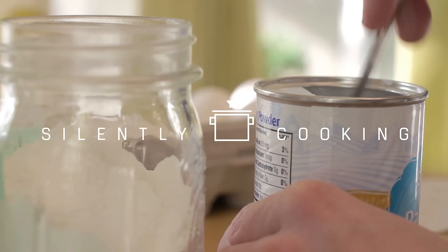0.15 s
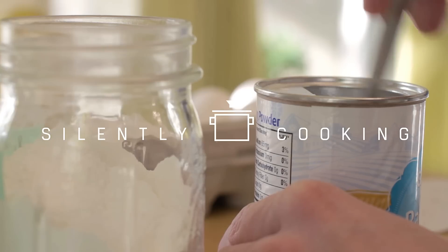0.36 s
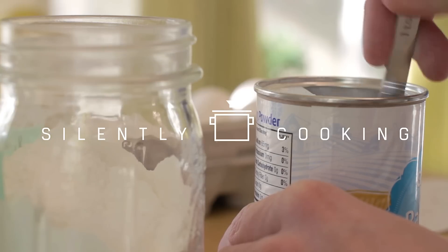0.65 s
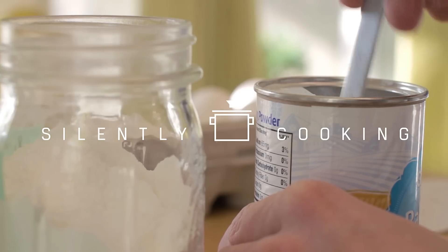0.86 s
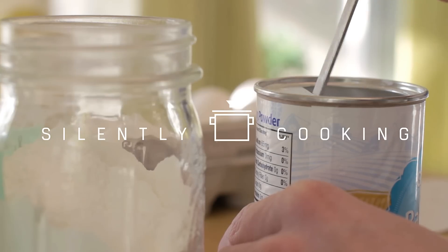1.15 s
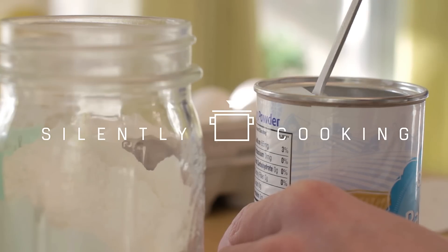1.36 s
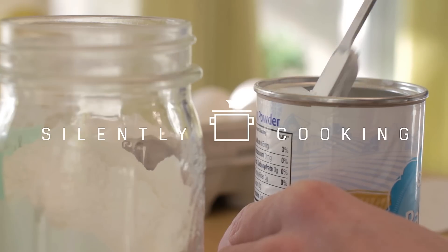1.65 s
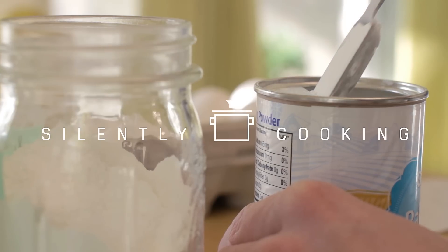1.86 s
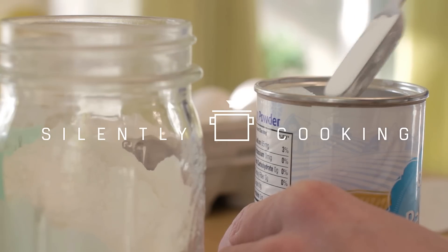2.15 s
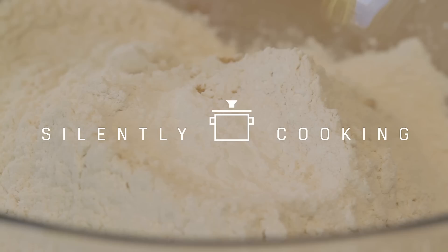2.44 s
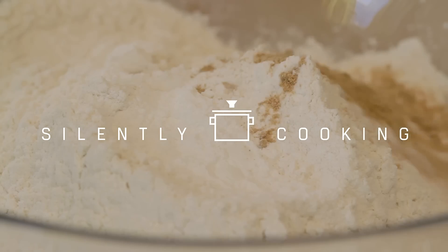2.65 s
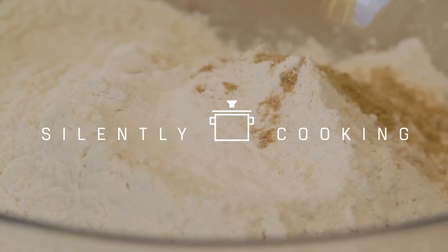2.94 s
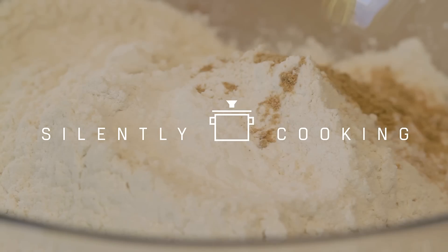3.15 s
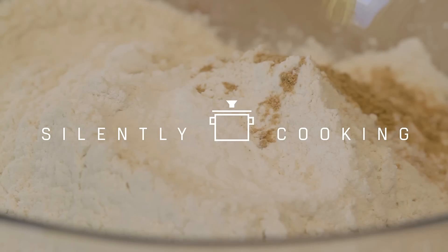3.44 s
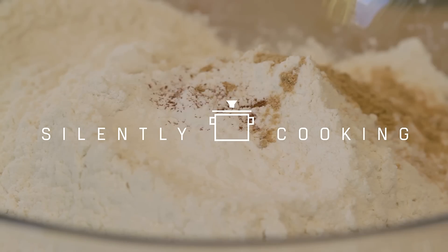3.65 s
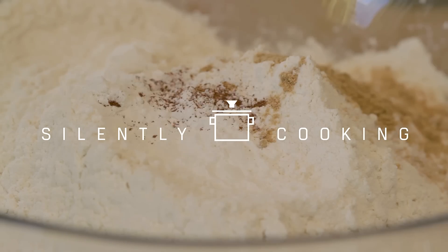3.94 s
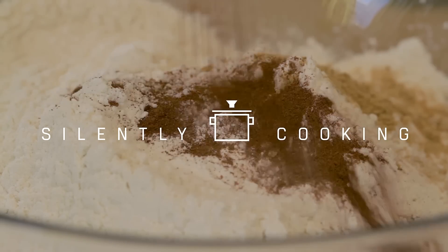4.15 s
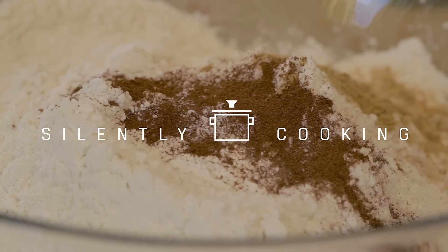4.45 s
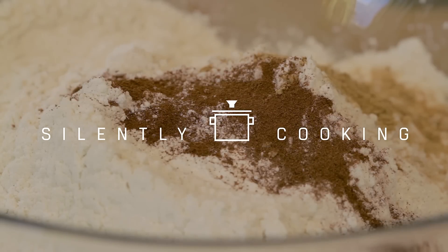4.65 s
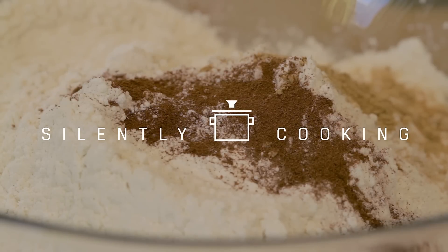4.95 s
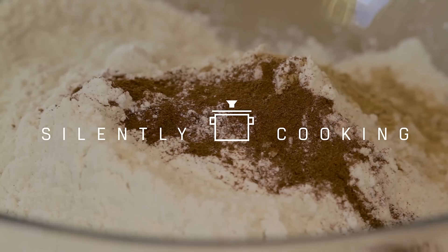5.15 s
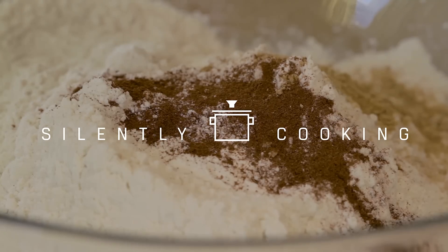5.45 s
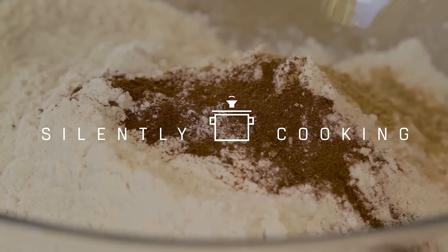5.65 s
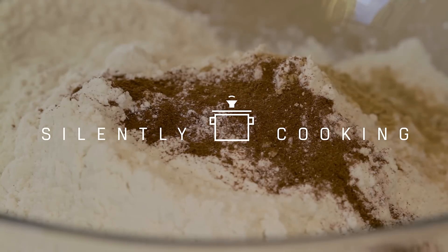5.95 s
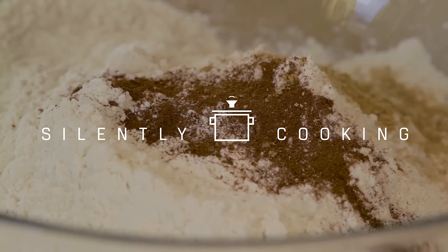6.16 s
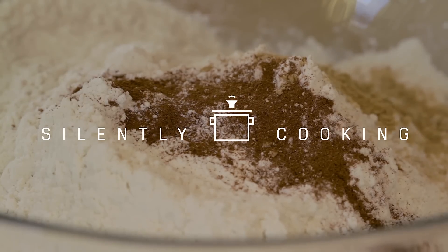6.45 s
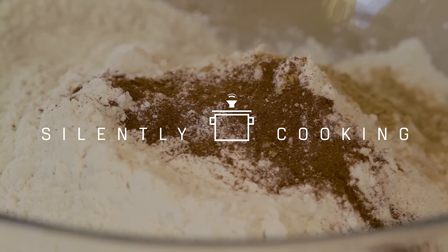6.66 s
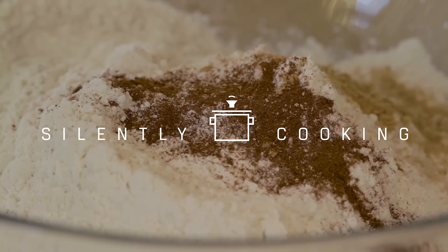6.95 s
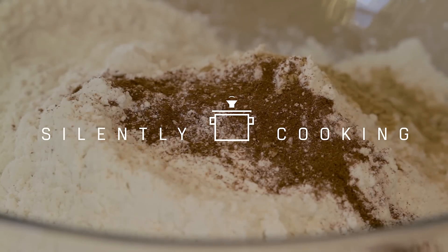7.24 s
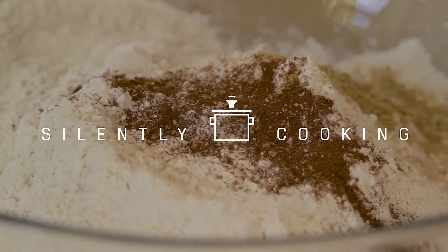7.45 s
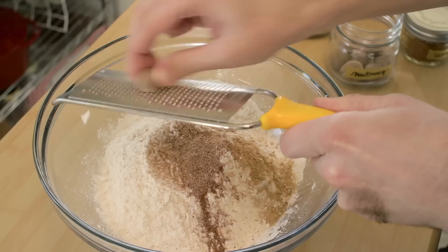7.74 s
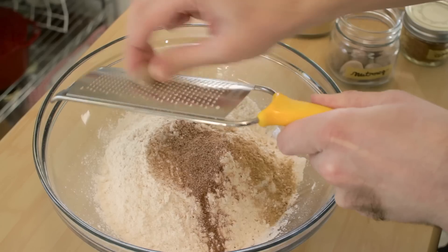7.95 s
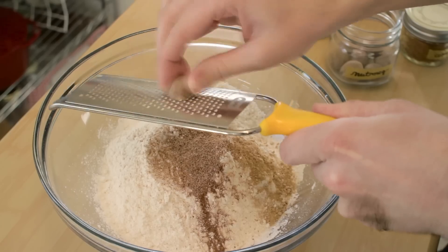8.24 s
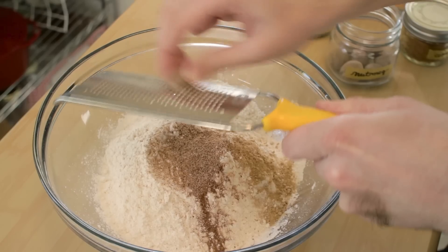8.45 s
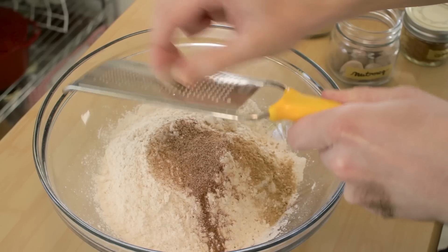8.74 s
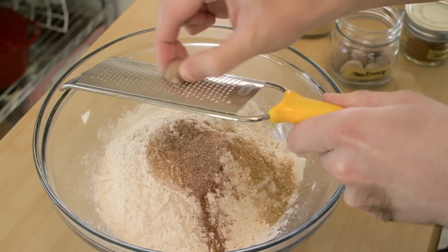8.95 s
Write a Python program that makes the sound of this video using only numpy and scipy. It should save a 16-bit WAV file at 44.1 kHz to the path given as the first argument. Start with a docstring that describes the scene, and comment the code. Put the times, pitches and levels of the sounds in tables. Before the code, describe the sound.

In a quiet kitchen, a spoon digs, clanks and drags along a tin's lip; after a near-silent pause, brisk back-and-forth metal grating runs to the end.

```python
"""A kitchen counter, close to a stereo microphone, over low room tone and hiss. A steel measuring spoon digs
in a tin of powder, knocks on it and is dragged along its lip: random fractures and struck modes coloured by
the tin. Shakes of spice sift down softly, then one light clink. A nutmeg is rubbed to and fro over a fine
steel rasp, about eleven strokes a second: bursts of crumbs shake a resonant blade. A second passage of
grating is closer and drier. Each source and its room echoes are heard almost wholly in the centre."""
import sys
import numpy as np
from scipy import signal
from scipy.fft import rfft, irfft
from scipy.io import wavfile
from scipy.ndimage import uniform_filter1d, map_coordinates

SR = 44100
rng = np.random.default_rng(int(sys.argv[2]) if len(sys.argv) > 2 else 0)


def generate_wav(sig):
    """Save sig (samples, or channels by samples) to the path in sys.argv[1] as 16-bit PCM at SR."""
    pcm = np.round(np.clip(np.atleast_2d(sig).T, -1, 1) * 32767).astype(np.int16)
    wavfile.write(sys.argv[1], SR, pcm)


N = 401751
TIME = np.arange(N) / SR
HZ = np.fft.rfftfreq(4096, 1 / SR)
SECOND_PASSAGE_S = 7.754  # strokes centred after this are in the closer, drier passage of grating


def amp(db):
    """Amplitude of a level in dB."""
    return 10 ** (np.asarray(db) / 20)


def evened(x):
    """The signal brought to an RMS of 1."""
    return x / np.sqrt(np.mean(x ** 2) + 1e-20)


def read(points, hz):
    """A spectrum joined by straight lines on a log-frequency axis."""
    f, value = np.transpose(points)
    return np.interp(np.log(hz + 1), np.log(f + 1), value)


def level(curve, fade_db_per_s=250):
    """Gain over time from (time [s], level [dB]) rows; silent before them, fading after them."""
    s, db = np.transpose(curve)
    fade_db = fade_db_per_s * np.maximum(TIME - s[-1], 0)
    return (TIME >= s[0]) * amp(np.interp(TIME, s, db) - fade_db)


def gestures(rows, attack_s, release_db_per_s):
    """Gain over time of short moves of the hand: each swells, holds for its length and dies away."""
    gain = np.zeros(N)
    for start, length, db, *_ in rows:
        t = np.arange(0, length + 1, 1 / SR)
        release_db = release_db_per_s * np.maximum(t - length, 0)
        add(gain, start, np.minimum(t / attack_s, 1) * amp(db - release_db))
    return gain


def add(mix, s, sound):
    """Lay a sound into the mix at a time in seconds."""
    part = mix[round(s * SR):][:len(sound)]
    part += sound[:len(part)]


def ringing(t, hz, t60):
    """One damped resonance, 60 dB down after t60 seconds."""
    return np.exp(-np.log(1000) * t / t60) * np.sin(2 * np.pi * hz * t)


def humps(modes):
    """The dB that resonances (frequency [Hz], width [Hz], height [dB]) add to a spectrum."""
    return sum(db / (1 + (2 * (HZ - hz) / width) ** 2) for hz, width, db in modes)


def response(db, low_cut_hz=105):
    """Causal impulse response of energy 1 with the given spectrum; small objects radiate little bass."""
    db = db - 10 * np.log10(1 + (low_cut_hz / (HZ + 1)) ** 4)
    log_gain = np.log(amp(np.maximum(db, db.max() - 90)))
    mirrored = np.r_[log_gain, log_gain[-2:0:-1]]
    minimum_phase = np.exp(np.conj(signal.hilbert(mirrored)))
    h = np.fft.ifft(minimum_phase).real
    return h / np.linalg.norm(h)


def through(x, db):
    """The signal coloured by a spectrum in dB."""
    return signal.oaconvolve(x, response(db))[:N]


def crackle(count, per_s, spread_db):
    """Tiny fractures at random moments, of varying size."""
    size = amp(spread_db * np.minimum(rng.exponential(1, count), 4))
    happens = rng.random(count) < per_s / SR
    return evened(size * rng.standard_normal(count) * happens)


# how long the kitchen's echoes last: (frequency [Hz], t60 [s])
ECHO_DECAY = [(150, 0.52), (1000, 0.29), (3000, 0.28), (7000, 0.2), (15000, 0.13)]


def reflections():
    """Dense wall echoes after a short gap, each band dying at its own speed."""
    count = SR // 2
    echoes = rng.choice([-1., 1.], count) * (rng.random(count) < .15)
    hz, t, z = signal.stft(echoes, SR, nperseg=256)
    decay = amp(-60 * t / read(ECHO_DECAY, hz)[:, None])
    tail = signal.istft(z * decay, SR, nperseg=256)[1]
    tail *= np.clip(np.arange(len(tail)) / SR / 0.0036 - 1, 0, 1)  # silent for 3.6 ms, then rising
    return tail / np.linalg.norm(tail)


# gain of the faint left-minus-right remainder: (frequency [Hz], level [dB])
SIDE_REMAINDER = [(100, -3), (300, -18), (700, -25), (1400, -81), (2800, -63), (5500, -65), (12000, -70)]


def kitchen(x, wet_db):
    """Direct sound and its room echoes almost wholly in the centre, with a faint left-right remainder."""
    mid, side = (amp(wet_db) * signal.oaconvolve(x, reflections())[:N] for _ in range(2))
    padded = 2 ** 19
    side_gain = amp(read(SIDE_REMAINDER, np.fft.rfftfreq(padded, 1 / SR)))
    side = irfft(rfft(side, padded) * side_gain)[:N]
    return x + mid + np.array([side, -side])


# room tone and hiss: (frequency [Hz], early level [dB], settled level [dB],
# level of the part that differs between the ears [dB])
ROOM_TONE = [(25, -32, -37, -26), (50, -24, -19, -27), (71.54, -15.5, -11, -26), (111, -9, -13, -16.5),
             (146, -9, -1.5, -12), (197, 3, -2.5, -5), (260.6, 0.5, -3.5, -4.5), (500, -2, -9, -4),
             (800, -5, -9, -4.5), (1493, -8, -11, -11), (5890, -11, -12.5, -10), (10100, -12, -16, -12),
             (15800, -19.5, -23, -21)]
SETTLING_S = (6.06, 6.8)  # the tone passes from its early to its settled colour between these times


def hush(gain_db=-49.5, second_side_db=-3):
    """Steady noise as room tone and hiss; it changes colour during the grating, then narrows."""
    hz, *columns = np.transpose(ROOM_TONE)
    f = np.fft.rfftfreq(N, 1 / SR)
    early, late, side = (irfft(rfft(rng.standard_normal(N)) * amp(read(np.c_[hz, db], f)), N)
                         for db in columns)
    settled = np.interp(TIME, SETTLING_S, [0, 1])
    centre = np.sqrt(1 - settled) * early + np.sqrt(settled) * late
    side = side * amp(second_side_db * (TIME >= SECOND_PASSAGE_S))
    return amp(gain_db) * (centre + np.array([side, -side]))


# pushes of the spoon through the powder: (start [s], length [s], level [dB])
DIG_MOVES = [(0, 0.0076, -48.5), (.928, 0.16, -51.5), (1.152, .022, -54.5)]
# colour of the crunching powder: (frequency [Hz], level [dB])
POWDER_COLOUR = [(88, -42), (150, -5), (314, 0), (381, -2), (471, 1.5), (948, -4), (1060, -3), (1240, -2.5),
                 (2230, -12), (3410, -5), (5330, -14), (6860, -12.5), (11100, -21), (12500, -18),
                 (15500, -32)]
# spoon dragged over the tin's lip: (time [s], level [dB])
LIP_LEVEL = [(1.33, -56), (1.37, -53), (1.388, -34.5), (1.518, -44), (1.536, -38.5), (1.634, -45.5),
             (1.65, -38), (1.686, -52), (1.95, -47.5)]
# it tips onto the sharp edge and is pulled off: (time [s], level [dB])
EDGE_LEVEL = [(1.68, -54.5), (1.85, -58), (1.952, -49), (1.98, -37.5), (2.005, -41.5), (2.014, -31),
              (2.052, -36.5), (2.06, -63)]
# broad colour of the flat lip, then of the sharp edge: (frequency [Hz], level [dB])
LIP_COLOUR = [(100, -19), (200, -10.5), (280, -0.5), (750, 4), (1300, -2), (1700, -7.5), (3600, -6.5),
              (6000, -13.5), (9000, -27), (16000, -38)]
EDGE_COLOUR = [(100, -24), (300, -10.5), (800, -3), (1900, -4.5), (3600, -7.5), (5500, -12), (7500, -16),
               (9000, -28), (12000, -28), (16000, -37)]
# resonances of the tin with the spoon against it:
# (frequency [Hz], width [Hz], height on the lip [dB], height on the edge [dB])
TIN_MODES = [(305, 94, 7, -5), (1247, 180, 12, 7), (1894, 86, -5.5, 9), (2550, 200, 8, 9.5),
             (3650, 280, 4, 7), (4090, 180, 10.5, 4), (5900, 260, -5, 5), (6950, 300, 9, 3),
             (7820, 440, 10, 10), (9100, 220, 5, 10), (10200, 260, 9, 13), (13600, 700, 9, 15)]
STIR_END_S, STIR_DB = 1.36, -64  # it stirs lightly between the digs, until it is lifted
JUDDER_DB, JUDDER_S = 2.5, .014  # depth and pace of its sticking and slipping on the lip


def spoon_drag(powder_coupling=0.22, lip_gain_db=-0.5):
    """Steel sticks and slips on the tin's lip, brighter on its edge; powder crunches under the bowl."""
    hz, width, lip_db, edge_db = np.transpose(TIN_MODES)
    on_lip, on_edge = humps(zip(hz, width, lip_db)), humps(zip(hz, width, edge_db))
    judder = np.interp(TIME / JUDDER_S, np.arange(SR), rng.standard_normal(SR))
    sliding = level(LIP_LEVEL, fade_db_per_s=128) * amp(lip_gain_db + JUDDER_DB * judder)
    lip_force = sliding * crackle(N, per_s=2500, spread_db=0)
    lip = through(lip_force, read(LIP_COLOUR, HZ) + on_lip)
    edge_force = level(EDGE_LEVEL) * crackle(N, per_s=2700, spread_db=0)
    edge = through(edge_force, read(EDGE_COLOUR, HZ) + on_edge)
    digs = gestures(DIG_MOVES, attack_s=0.0042, release_db_per_s=162)
    digging = np.hypot(digs, amp(STIR_DB) * (TIME < STIR_END_S))
    powder_force = digging * crackle(N, per_s=6000, spread_db=3.0)
    # buried in powder, the spoon wakes the tin only weakly
    powder = through(powder_force, read(POWDER_COLOUR, HZ) + powder_coupling * on_lip)
    return lip + edge + powder


# the spoon chatters on the tin's wall: (time [s], mean pitch [Hz], level [dB])
WALL_CHATTER = [(0, 443, -59), (.022, 442, -53.5), (.052, 431, -48), (.08, 430, -58), (.11, 433, -60),
                (.15, 427, -74)]


def chatter(waver=0.083, flutter=0.52):
    """A short uneven groan of the spoon rubbing the tin's wall: a tone of wandering pitch and level."""
    s, hz, db = np.transpose(WALL_CHATTER)
    drift, swell = (evened(uniform_filter1d(rng.standard_normal(N), 300)) for _ in range(2))
    turns = np.cumsum(np.interp(TIME, s, hz) * (1 + waver * drift)) / SR
    return np.sqrt(2) * level(np.c_[s, db]) * (1 + flutter * swell) * np.sin(2 * np.pi * turns)


# dull bumps of the utensils: (time [s], level [dB], frequency [Hz], t60 [s])
UTENSIL_BUMPS = [(0.241, -45, 323, .06), (.285, -42, 142, 0.093), (0.285, -30.5, 286, 0.051),
                 (0.501, -33, 330, 0.035), (.501, -43.5, 610, 0.027), (.501, -44, 1190, 0.027),
                 (.579, -46.5, 357, 0.11), (1.156, -42.5, 326, 0.066), (1.357, -32, 284, 0.038),
                 (1.573, -34, 326, 0.1), (1.592, -31, 340, 0.09), (2.05, -15, 1237, 0.022),
                 (4.067, -47, 211, 0.061)]


def bumps(rise_cycles=1.13):
    """Soft contacts, each swelling over a cycle or so and waking one quickly damped resonance."""
    out, t = np.zeros(N), np.arange(SR // 4) / SR
    for s, db, hz, t60 in UTENSIL_BUMPS:
        swell = 1 - np.exp(-(hz * t / rise_cycles) ** 2)
        add(out, s, amp(db) * swell * ringing(t, hz, t60))
    return out


# the spoon's knocks, bounces and ticks: (time [s], strength [dB], tilt [dB per octave])
SPOON_KNOCKS = [(0.284, 7.5, 1.5), (0.285, 3, 4.5), (.2862, -10, -2), (0.2882, -15, -9), (0.2944, -3, -6),
                (0.3246, -7, 0), (.968, -22.5, 14), (1.05, -31, 12), (1.0648, -24, 14), (1.08, -23, 1),
                (1.1669, -29, 4), (1.637, -21, 4), (2.051, -13, 4)]
# colour of the crack of a knock: (frequency [Hz], level [dB])
KNOCK_COLOUR = [(100, -37), (300, -8.5), (550, -7), (850, 9), (1400, 5.5), (2100, -9), (2600, 1),
                (3700, 5.5), (4500, -7.5), (5200, -4.5), (6300, -7), (7100, -23), (7900, -14.5),
                (10800, -24), (15500, -42)]
# what a knock rings with: (frequency [Hz], level [dB], t60 [s])
KNOCK_RING = [(697, -19, 0.16), (795, 6, 0.076), (1000, 15, 0.079), (1130, -0.5, .12), (1420, 7, 0.15),
              (1810, 5, 0.13), (2620, -17.5, 0.17), (2662, -9, .13), (3170, -6, .1), (3535, -12, 0.078),
              (3662, -16, 0.082), (3900, -21, .14), (4000, -3, .11), (5160, -17, .12), (5130, -11.5, .09),
              (5400, -15, .12), (5630, -18.5, 0.13), (6100, -16.5, .11), (7900, -21.5, 0.091),
              (8120, -9, .13)]


def knocks(ring_db=-51, smear=0.5, clatter_db=-7, clatter_t60=0.055):
    """Hard contacts on sheet metal: a smeared crack, a clatter of dense modes, and clear ones ringing on."""
    cracks, ring, t = np.zeros(N), np.zeros(N), np.arange(SR // 3) / SR
    for s, db, tilt_db in SPOON_KNOCKS:
        tilt = tilt_db * np.log2(HZ / 3000 + 0.19)
        add(cracks, s, amp(db) * response(read(KNOCK_COLOUR, HZ) + tilt))
        for k, (hz, mode_db, t60) in enumerate(KNOCK_RING):
            gain = (-1) ** k * amp(db + ring_db + mode_db + tilt_db * np.log2(hz / 3000))
            add(ring, s, gain * ringing(t, hz, t60))
    for _ in range(8):  # bending waves: the treble arrives first
        cracks = signal.lfilter([-smear, 1], [1, -smear], cracks)
    dense = rng.standard_normal(len(t)) * np.exp(-np.log(1000) * t / clatter_t60)
    clatter = signal.oaconvolve(cracks, dense / np.linalg.norm(dense))[:N]
    return cracks + ring + amp(clatter_db) * clatter


# thin squeals of the sliding spoon: (start [s], length [s], level [dB], pitch [Hz])
SPOON_SQUEALS = [(1.389, .03, -46, 7040), (1.545, 0.069, -59, 7120), (1.832, .08, -58, 6990),
                 (1.958, .035, -54, 7250)]


def squeal(width_hz=380):
    """Friction keeps one high mode of the spoon ringing; it drifts with the point of contact."""
    start, length, _, hz = np.transpose(SPOON_SQUEALS)
    r = np.exp(-np.pi * width_hz / SR)
    noise = rng.standard_normal(N) + 1j * rng.standard_normal(N)
    ring = signal.lfilter([1], [1, -2 * r, r * r], noise)
    turns = np.cumsum(np.interp(TIME, start + length / 2, hz)) / SR
    tone = evened((ring * np.exp(2j * np.pi * turns)).real)  # the narrow noise moved up to the pitch
    return gestures(SPOON_SQUEALS, attack_s=.02, release_db_per_s=300) * tone


# shakes of spice sift softly into the bowl: (start [s], length [s], level [dB])
SPICE_SHAKES = [(3.24, 0.23, -66), (3.53, .27, -70), (4.04, 0.066, -65.5), (4.25, .04, -67),
                (4.38, .04, -73)]
# colour of the falling spice: (frequency [Hz], level [dB])
SPICE_COLOUR = [(80, -16), (200, 4), (500, -1.5), (1400, -5), (3000, -11), (7000, -21), (15000, -35)]


def sifting():
    """Fine powder landing on flour: many tiny impacts, dull in colour."""
    flow = gestures(SPICE_SHAKES, attack_s=0.03, release_db_per_s=122.5)
    return through(flow * crackle(N, per_s=3700, spread_db=2.0), read(SPICE_COLOUR, HZ))


# a light clink across the counter: (time [s], strength [dB])
CLINK_CONTACTS = [(4.7168, -22.5), (4.752, -35)]
# its colour: (frequency [Hz], level [dB])
CLINK_COLOUR = [(300, -25), (700, -16), (1100, -1), (1500, -8), (1900, -16), (2300, -9), (2700, -11.5),
                (3300, -17), (3700, -5), (4200, -18), (5000, -14), (7000, -23), (12000, -36)]


def clinks(fade_s=0.013):
    """Something small is set down: a brief rattle of contacts."""
    force, t = np.zeros(N), np.arange(SR // 10) / SR
    for s, db in CLINK_CONTACTS:
        rattle = crackle(len(t), per_s=5500, spread_db=2.5) * np.exp(-t / fade_s)
        add(force, s, amp(db) * rattle / np.linalg.norm(rattle))
    return through(force, read(CLINK_COLOUR, HZ))


CATCH_S, SKATE_DB = .018, -4  # the nut skates this long, this much quieter, until the teeth catch
CHIP_DB, CHIP_S = 3, 0.0019  # mean surge and half-length of the one larger chip that a stroke breaks off


def hold_of_teeth(t):
    """Slack until the teeth catch, then a short surge where a chip breaks off."""
    chip_at, chip_size = rng.uniform(0.212, .8) * t[-1], 2 * rng.random()
    surge_db = CHIP_DB * chip_size * np.exp(-((t - chip_at) / CHIP_S) ** 2)
    return amp(SKATE_DB * (t < CATCH_S) + surge_db)


def blade_echo(force, speed, near_s=0.000522, travel_s=0.000882, strength=0.32):
    """Waves return from the blade's end; their delay slides as the nut travels, so the colour sweeps."""
    place = np.cumsum(speed) / speed.sum()
    nearest_s = near_s * (1 + 2 * rng.random())
    slide_s = travel_s * rng.uniform(0.33, 1)
    lag = nearest_s + slide_s * (place if rng.random() < .5 else 1 - place)
    returned = map_coordinates(force, [np.arange(len(force)) - lag * SR], order=3)
    return (force + strength * returned) / np.hypot(1, strength)


# a push cuts brightly, the way back rubs duller: (frequency [Hz], pushed [dB], drawn back [dB])
BITE_COLOUR = [(450, 0, 0.5), (1190, -4.5, 2), (2800, -2, .5), (7500, -0.5, -2), (13000, 2, -2)]
# level of the grating's low end: (time [s], level [dB])
LOW_END_LEVEL = [(5.1, 10), (5.8, 11.5), (6.05, 4), (6.5, 7), (6.75, 0.5), (7.25, -0.5), (7.5, 0),
                 (7.78, 2.5), (7.93, 11), (8.13, 2.5), (8.43, 11.5), (8.7, -2), (8.97, 2.5)]
LOW_END_HZ = (700, 1240)  # how far up it reaches in the first and the second passage
FASTEST_SHARE = .455  # how far into a stroke the nut moves fastest
SPEED_POWER = 1.305  # the force grows as this power of speed


def stroke(row, passage, teeth_hz=420, jitter=.3, snag=0.3, patchy_db=2.5):
    """The nut speeds up and slows; each row of teeth it meets tears off a burst of crumbs."""
    start, length, db, bite = row
    t = np.arange(0, length, 1 / SR)
    speed = np.abs(np.sin(np.interp(t / length, [0, FASTEST_SHARE, 1], [0, np.pi / 2, np.pi])))
    wander = evened(uniform_filter1d(rng.standard_normal(SR // 4), 200))[:len(t)]
    # rows of teeth passed so far; teeth_hz is their mean rate at full speed
    teeth = np.cumsum(teeth_hz * speed * (1 + jitter * wander)) / SR + rng.random()
    cutting = evened(1 - snag + 2 * snag * np.exp(-(teeth % 1) / 0.38))
    crumbs = crackle(SR // 4, per_s=22000, spread_db=0.5)[:len(t)]
    force = blade_echo(speed ** SPEED_POWER * cutting * crumbs, speed)
    hz = np.fft.rfftfreq(len(t), 1 / SR)
    pushing = (1 + bite) / 2
    colour = read([(f, drawn + (pushed - drawn) * pushing) for f, pushed, drawn in BITE_COLOUR], hz)
    low_db = np.interp(start + length / 2, *np.transpose(LOW_END_LEVEL))
    low_end = low_db / (1 + (hz / LOW_END_HZ[passage]) ** 4)
    # each pass takes another path over the blade and favours other modes
    path = np.interp(hz, np.linspace(0, SR / 2, 160), rng.standard_normal(size=160))
    coloured = irfft(rfft(force) * amp(colour + low_end + patchy_db * path), len(t))
    return amp(db) * hold_of_teeth(t) * coloured


# the nut goes to and fro:
# (start [s], length [s], level [dB], bite [about 1 pushed on the teeth, about -1 drawn back])
NUT_STROKES = [(5.108, 0.16, -41, -0.14), (5.286, 0.13, -44.5, -0.56), (5.383, 0.095, -33, 0.86),
               (5.503, 0.11, -35.5, -1.2), (5.593, 0.101, -33, 1), (5.69, 0.1, -32.5, -1.8),
               (5.785, 0.082, -30, 0.4), (5.871, 0.091, -27.5, -1.6), (5.966, 0.081, -28, -0.13),
               (6.047, 0.098, -33, -1.2), (6.141, 0.098, -27.5, 0.95), (6.233, 0.081, -30.4, -1.4),
               (6.319, 0.095, -28.5, 0.38), (6.411, 0.093, -28.5, -1), (6.5, 0.099, -26, 1),
               (6.612, 0.061, -28, -1.3), (6.682, 0.095, -27.5, 0.74), (6.768, 0.1, -31.5, -1.2),
               (6.855, 0.093, -25.5, 0.72), (6.957, 0.08, -26, -0.68), (7.046, 0.09, -26, 1),
               (7.141, 0.083, -25.5, -1.2), (7.223, 0.094, -26, 1), (7.328, 0.065, -27.5, 0.29),
               (7.404, 0.09, -26.5, 1), (7.467, 0.11, -27, -0.18), (7.561, 0.1, -28.5, 0.52),
               (7.646, 0.097, -25.5, 1), (7.745, 0.11, -31.5, -1), (7.856, 0.11, -26, 1),
               (7.971, 0.078, -26.5, -0.51), (8.064, 0.093, -23, 0.64), (8.165, 0.11, -28, -0.88),
               (8.274, 0.08, -21.5, 0.94), (8.354, 0.091, -25.5, -0.64), (8.447, 0.093, -25.5, 1),
               (8.543, 0.096, -26.5, -1.3), (8.631, 0.1, -25.5, -0.014), (8.733, 0.1, -31, -1.1),
               (8.823, 0.1, -29, 0.45), (8.92, 0.094, -45, -1.2)]
# resonances of the rasp's blade:
# (frequency [Hz], width [Hz], height in the first passage [dB], height in the second passage [dB])
BLADE_MODES = [(607, 580, 7.5, -7.5), (986, 81, -0.5, 4), (1103, 42, 5.5, 0), (1156, 500, 0.0, 9.5),
               (1389, 386, 16, 1.5), (1619, 230, 11.5, 2), (1729, 224, 11.5, 12.5), (1984, 287, 16.5, 12),
               (2197, 88, 10.5, 9.5), (2303, 48, 13, 0), (2413, 34, 12, -5), (2855, 344, 10.5, 12.5),
               (3930, 280, 8.5, 1), (4520, 160, -0.8, 8), (5136, 176, 7.5, 5.5), (6300, 800, 7, 3.5),
               (6880, 340, 4.5, 2), (7286, 190, 10, 3), (7590, 170, 8.5, 1), (8114, 250, 13, 7),
               (8650, 400, 9, 8), (9165, 230, 15.5, 14), (9460, 200, 10.5, 5.5), (9620, 140, 7.5, 11.5),
               (10100, 560, 13, 11), (10830, 370, 7, 10), (11570, 334, 7.5, 3.5), (12200, 318, 0.5, 3.3)]
# broad colour of the grating: (frequency [Hz], first passage [dB], second passage [dB])
RASP_COLOUR = [(120.0, -50, -45), (241, -39.5, -35), (480, -22.5, -11.5), (1010, -16.5, -19.5),
               (1726, -27, -19.5), (3190, -2, -2.5), (4750, -6.5, -7.5), (6850, -9, -4), (9790, -18, -16),
               (12600, -13, -15), (15500.0, -22.5, -18)]
PASSAGE_DB = (0.11, 0.3)  # gain of the grating in the first and the second passage


def grater(passage, gain_db):
    """The strokes of one passage of grating shake the blade, which has its own colour in each passage."""
    force = np.zeros(N)
    for row in NUT_STROKES:
        start, length = row[:2]
        in_second_passage = start + length / 2 >= SECOND_PASSAGE_S
        if in_second_passage == passage:
            add(force, start, stroke(row, passage))
    modes = [(hz, width, heights[passage]) for hz, width, *heights in BLADE_MODES]
    broad = [(hz, dbs[passage]) for hz, *dbs in RASP_COLOUR]
    return amp(gain_db) * through(force, read(broad, HZ) + humps(modes))


def scene():
    """The spoon work, sifting spice, the clink, then two passages of grating, all over the hush."""
    mix = hush()
    mix = mix + kitchen(spoon_drag() + chatter() + squeal() + sifting(), wet_db=-9.5)
    mix = mix + kitchen(bumps(), wet_db=-15.5)
    mix = mix + kitchen(knocks(), wet_db=-12.0)
    mix = mix + kitchen(clinks(), wet_db=4.0)  # across the counter: more room than direct sound
    first, second = (grater(passage, gain_db) for passage, gain_db in enumerate(PASSAGE_DB))
    return mix + kitchen(first, wet_db=-9.5) + kitchen(second, wet_db=-12.5)


def record(dry):
    """The recorder's band limit: a steep low-pass at 15850 Hz."""
    low_pass = signal.firwin(511, 15850, window=("kaiser", 9), fs=SR)
    return signal.oaconvolve(dry, low_pass[None], "same")


dry = scene()
out = record(dry)
generate_wav(out)
```